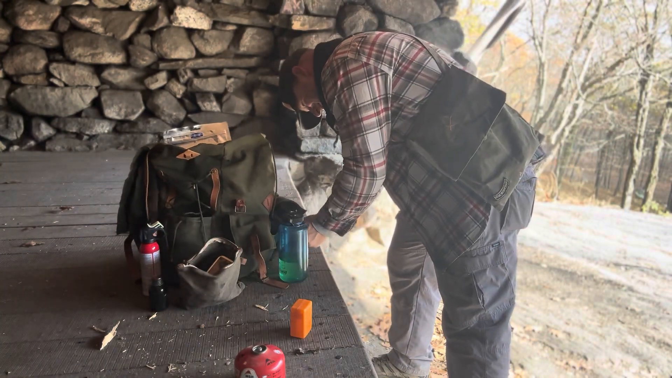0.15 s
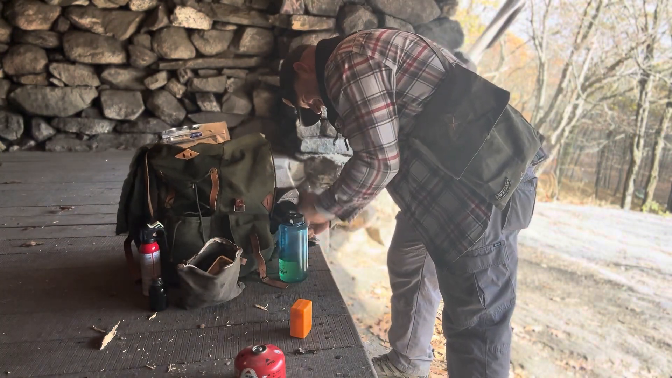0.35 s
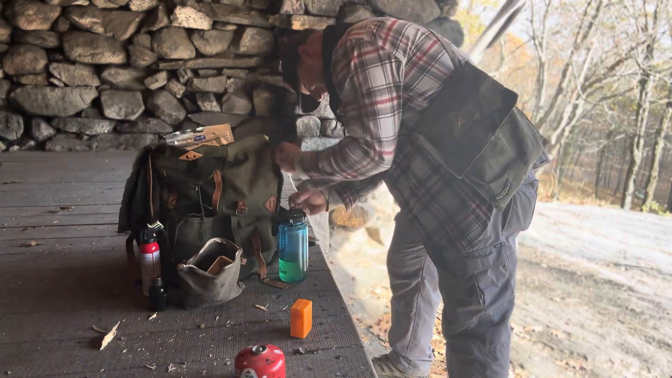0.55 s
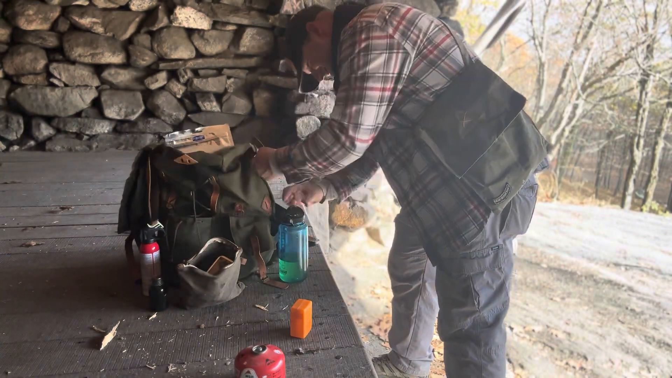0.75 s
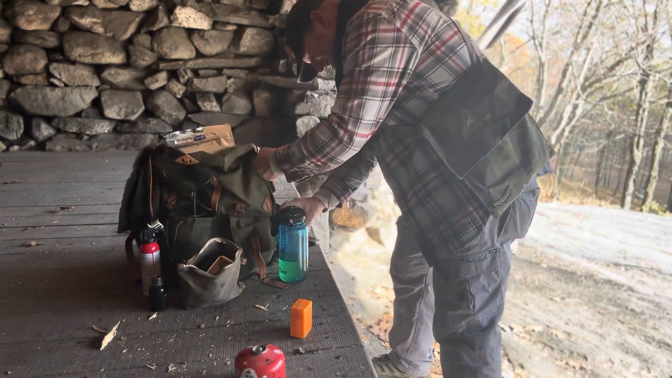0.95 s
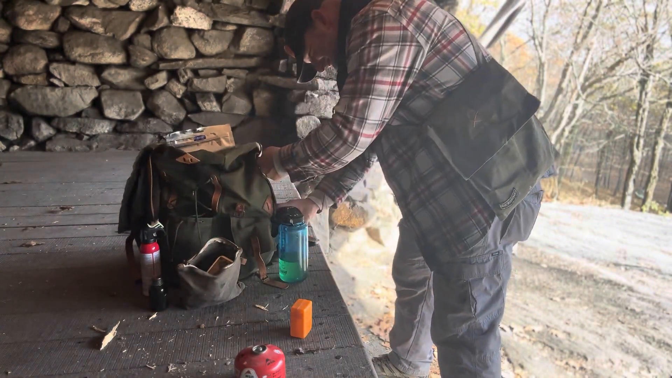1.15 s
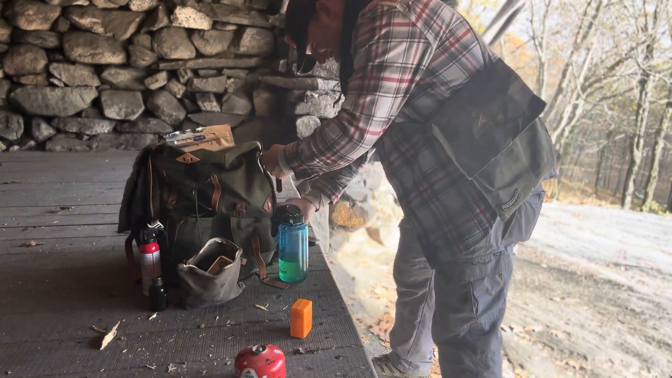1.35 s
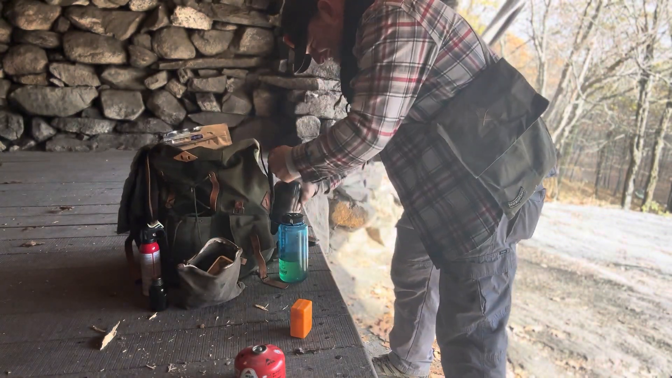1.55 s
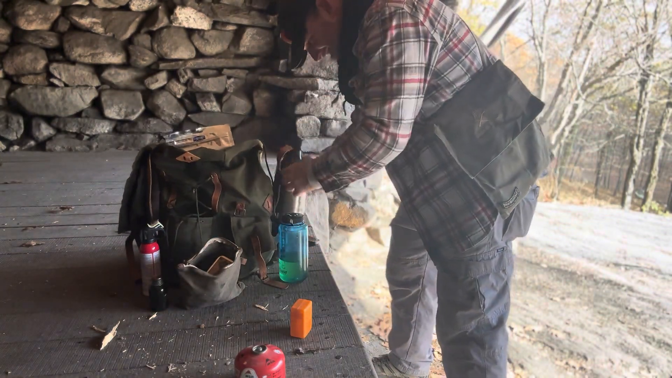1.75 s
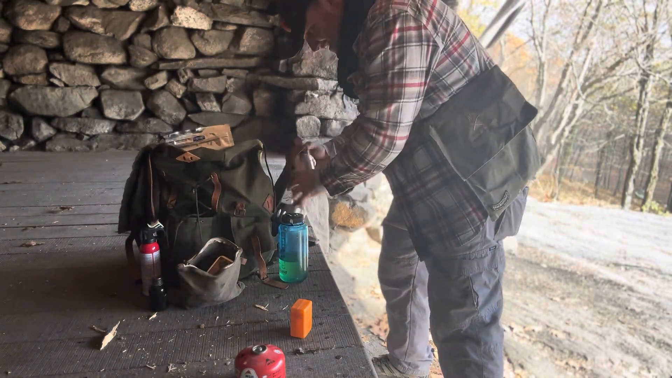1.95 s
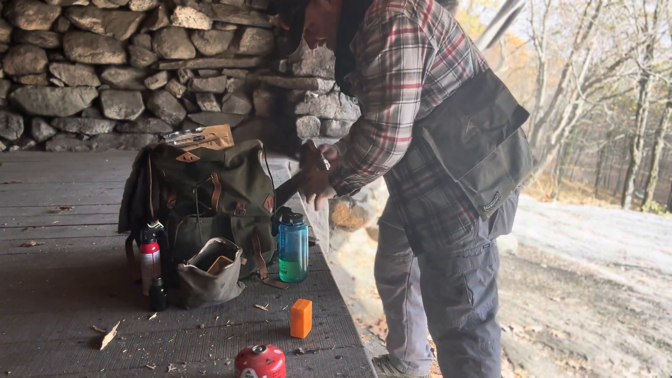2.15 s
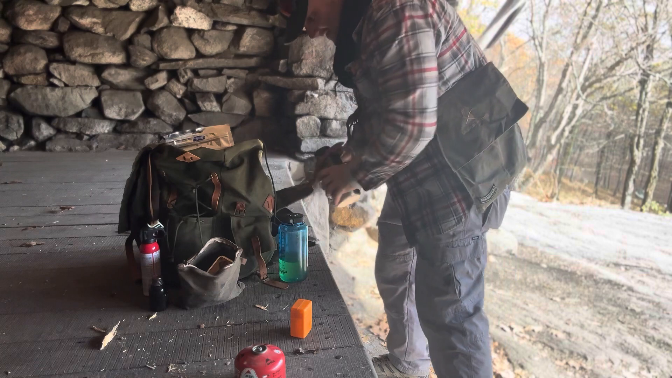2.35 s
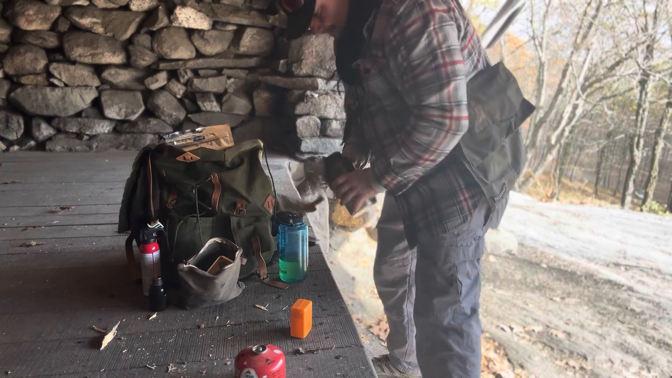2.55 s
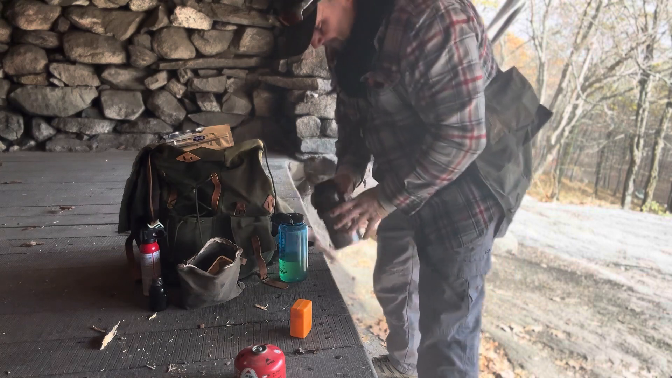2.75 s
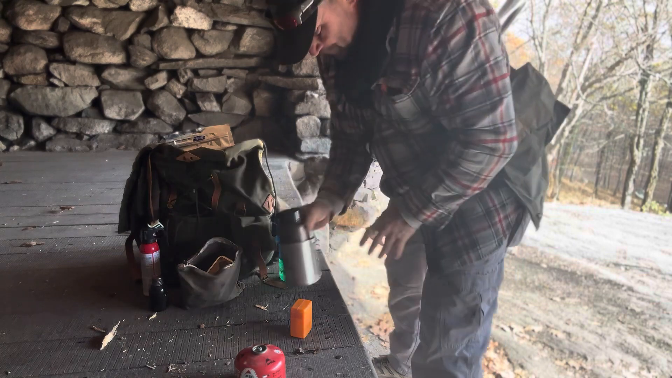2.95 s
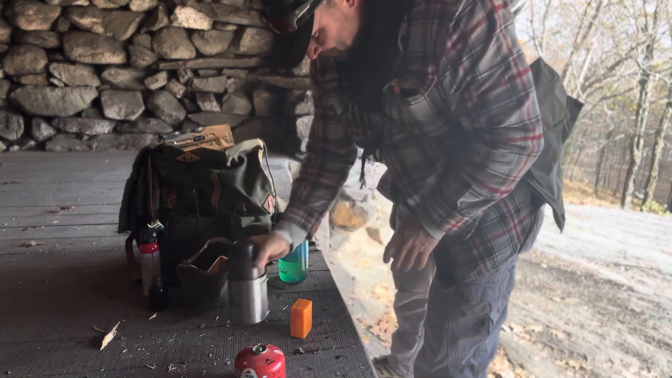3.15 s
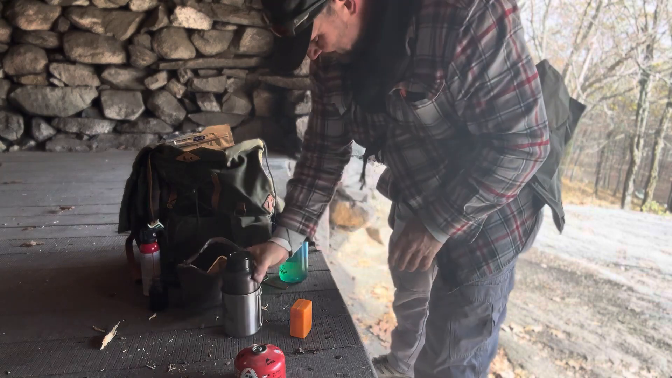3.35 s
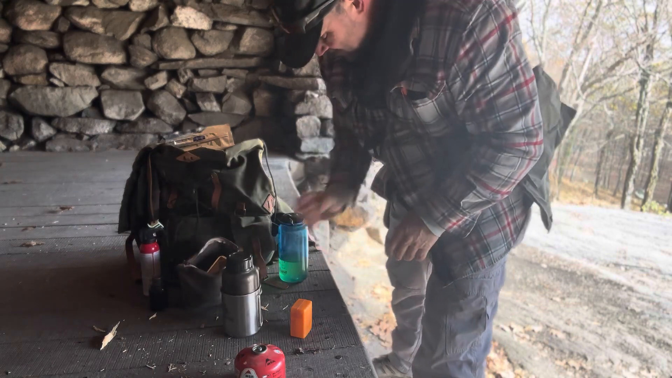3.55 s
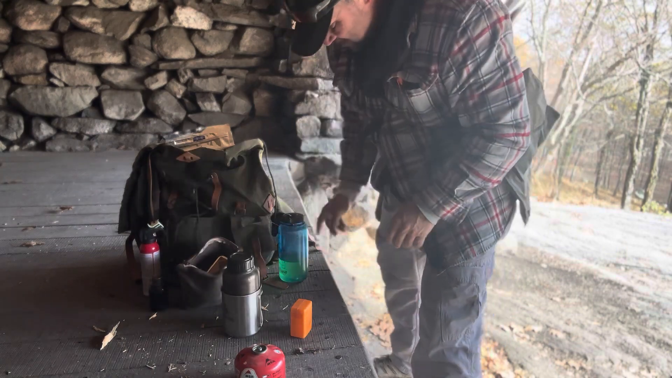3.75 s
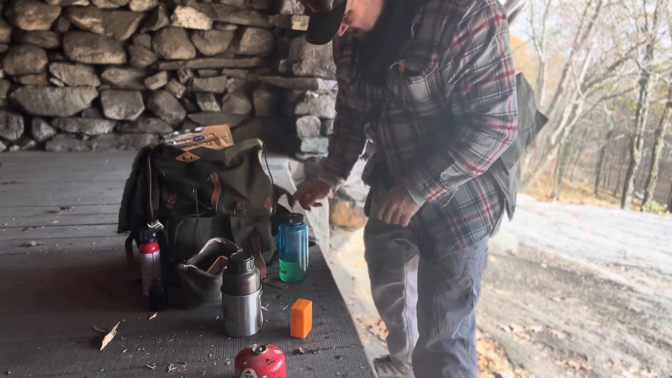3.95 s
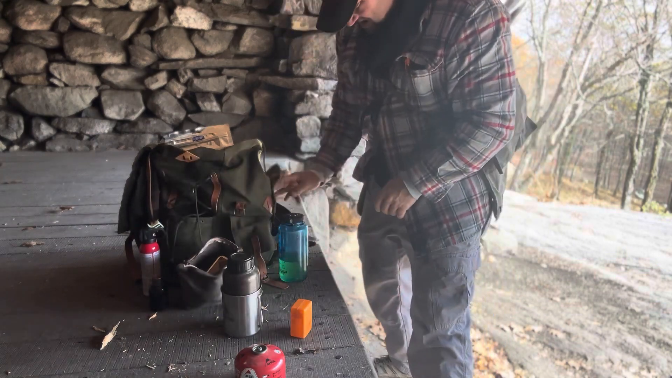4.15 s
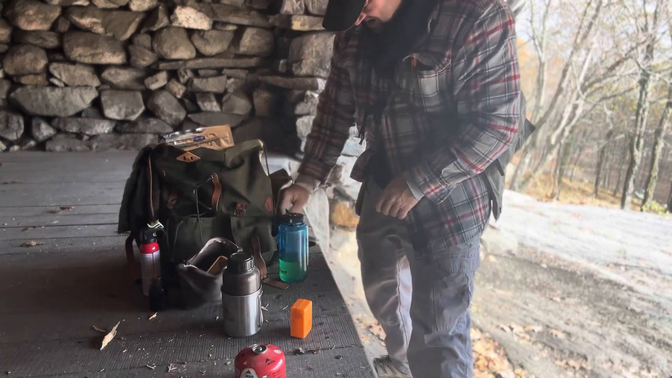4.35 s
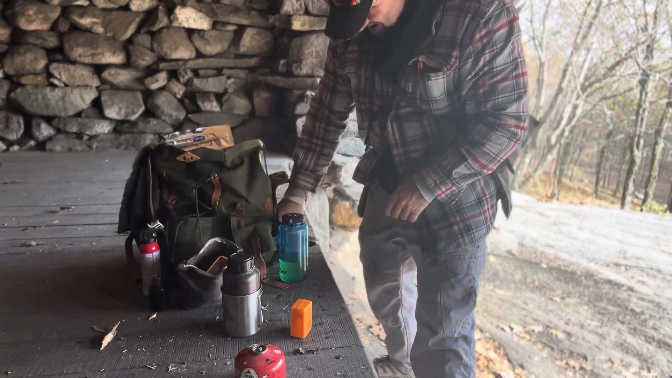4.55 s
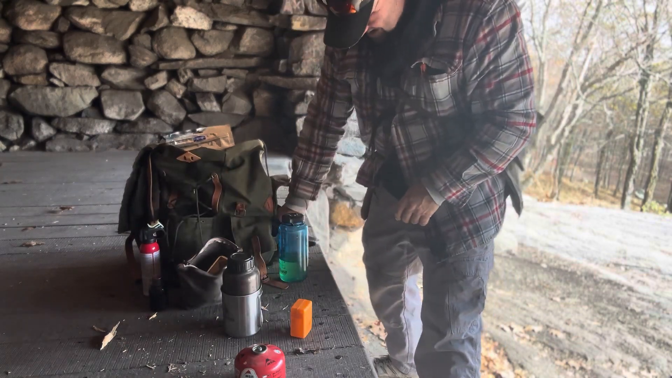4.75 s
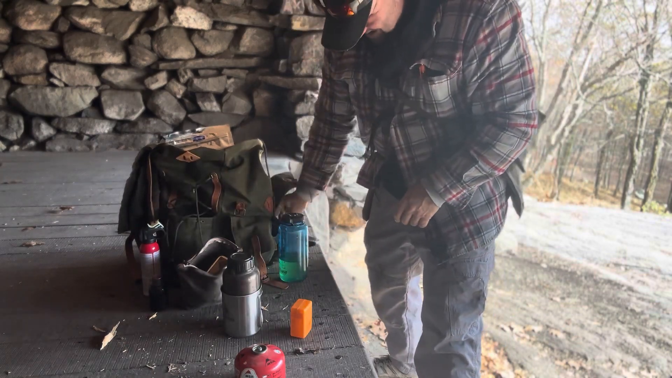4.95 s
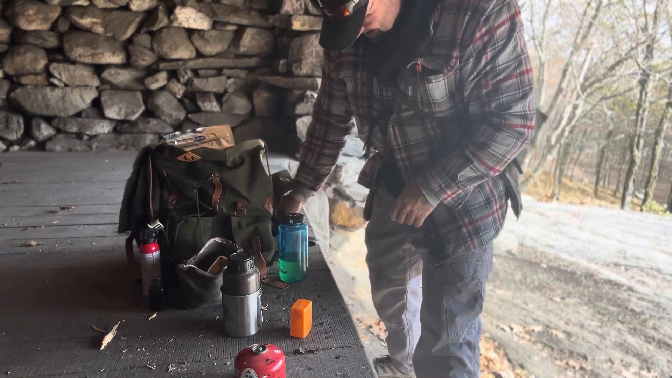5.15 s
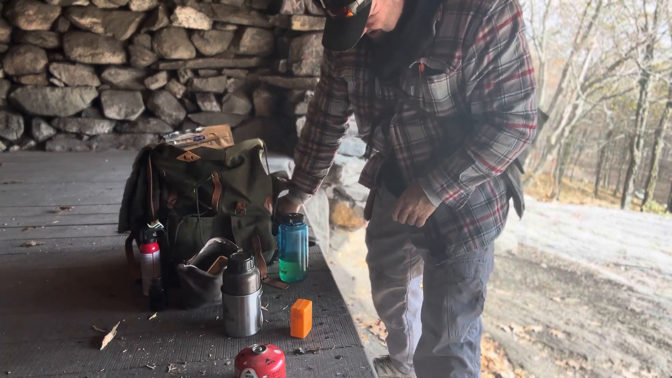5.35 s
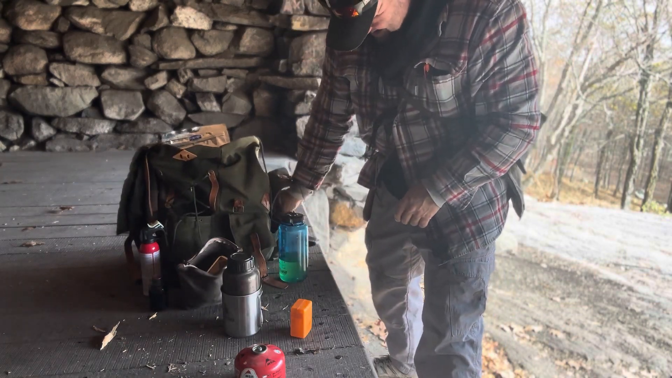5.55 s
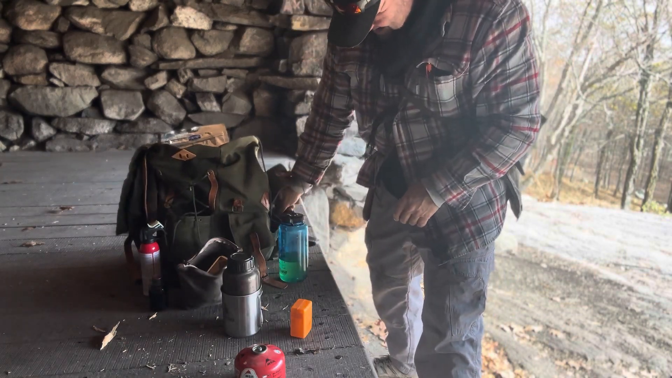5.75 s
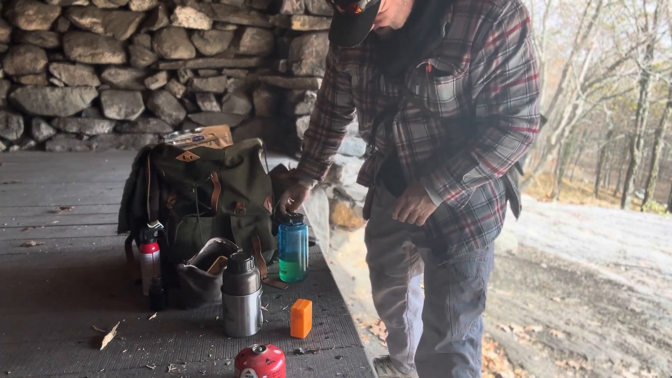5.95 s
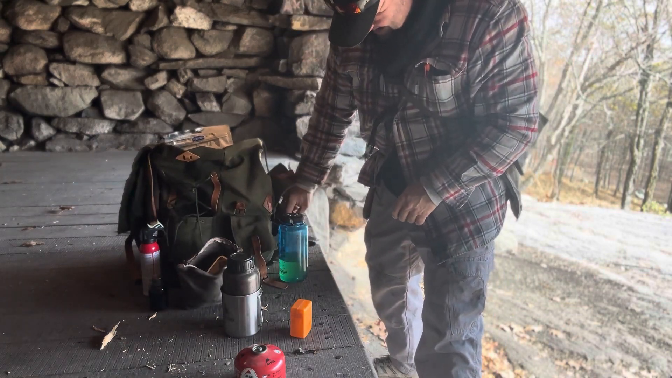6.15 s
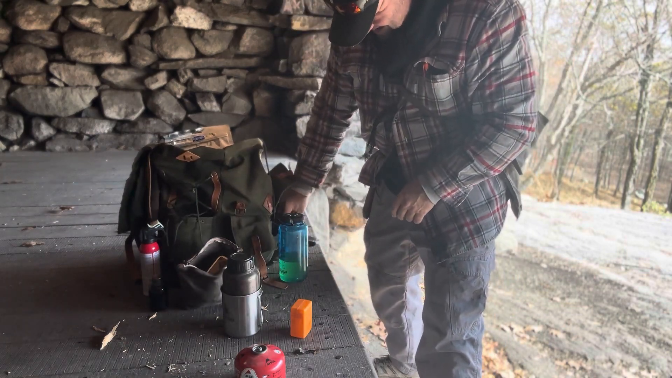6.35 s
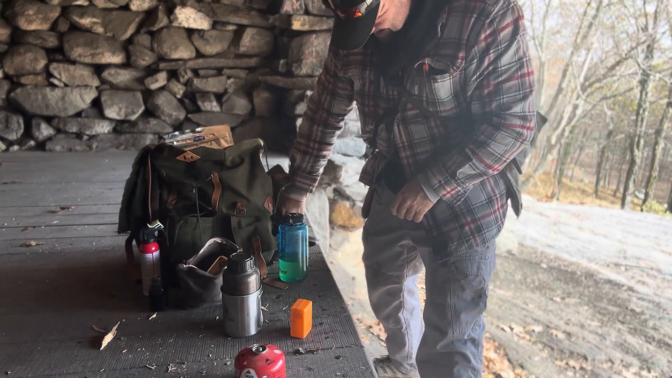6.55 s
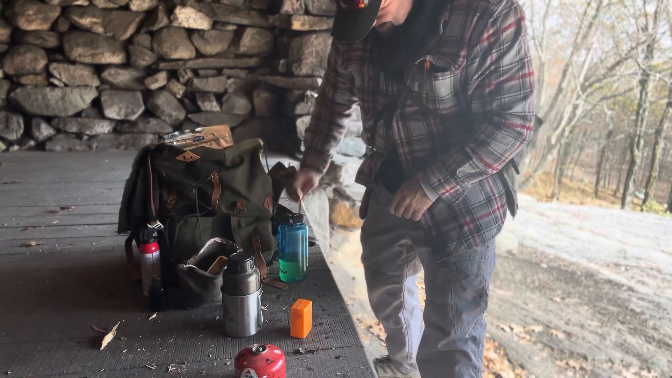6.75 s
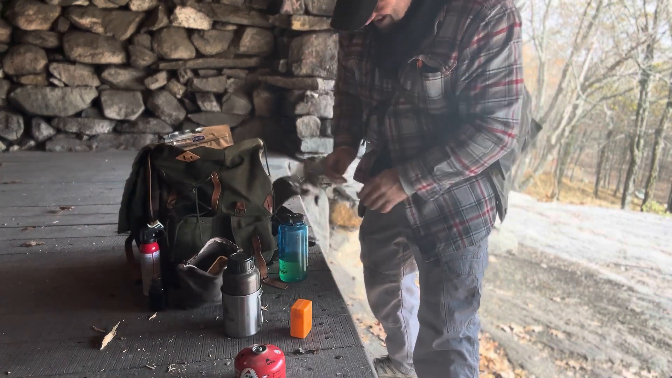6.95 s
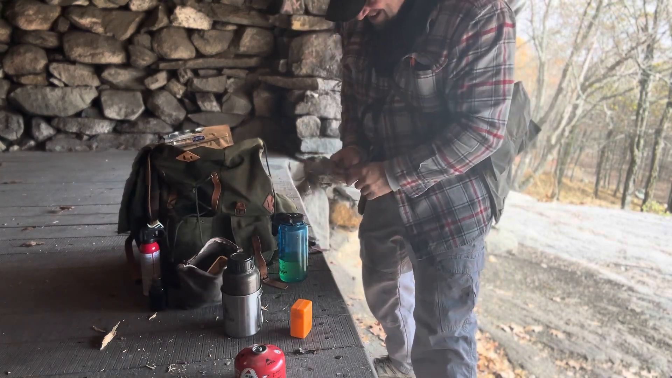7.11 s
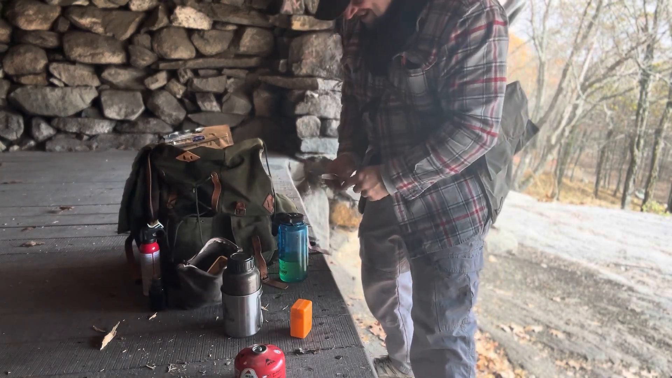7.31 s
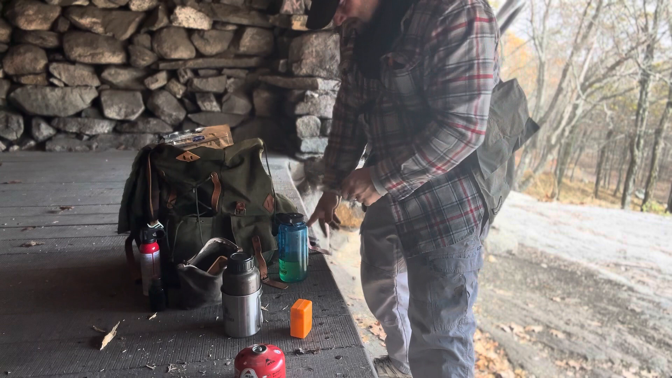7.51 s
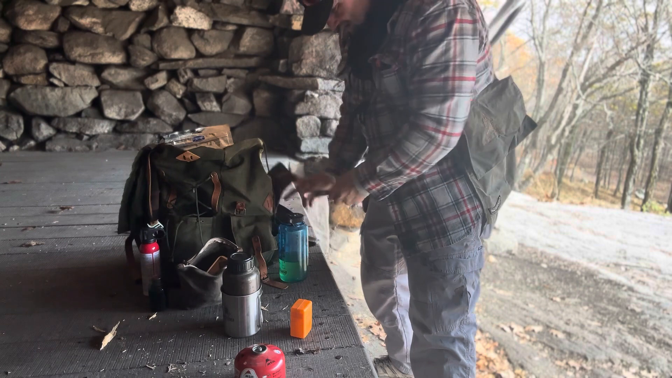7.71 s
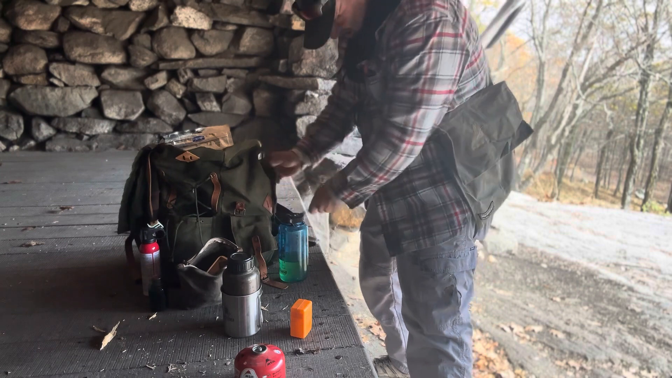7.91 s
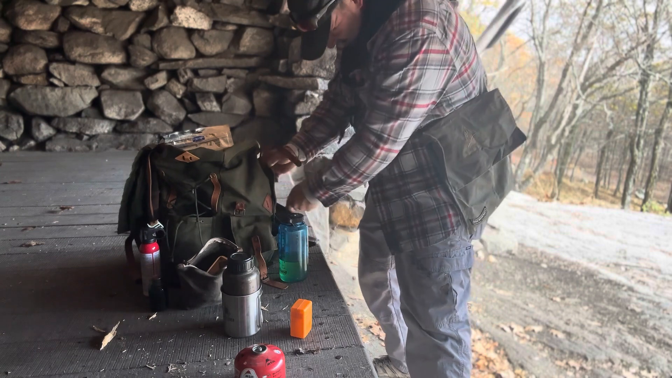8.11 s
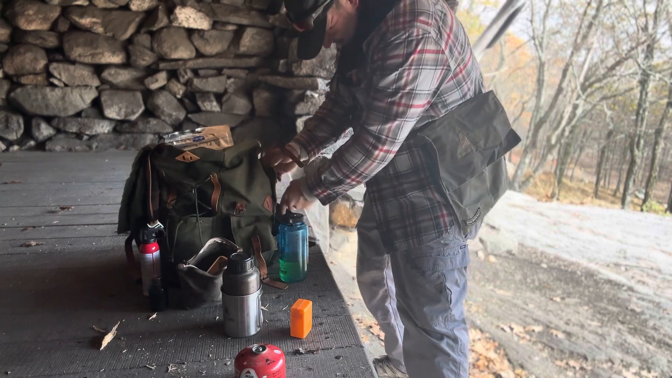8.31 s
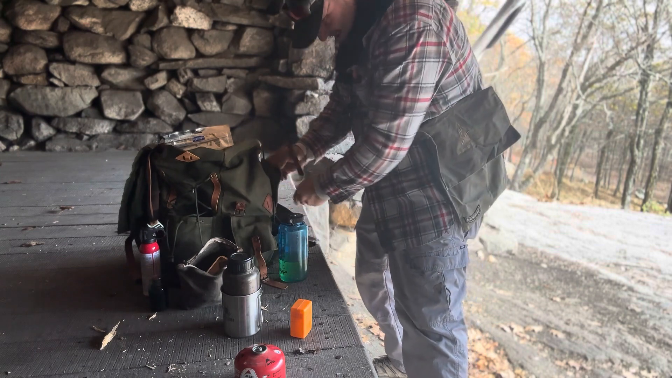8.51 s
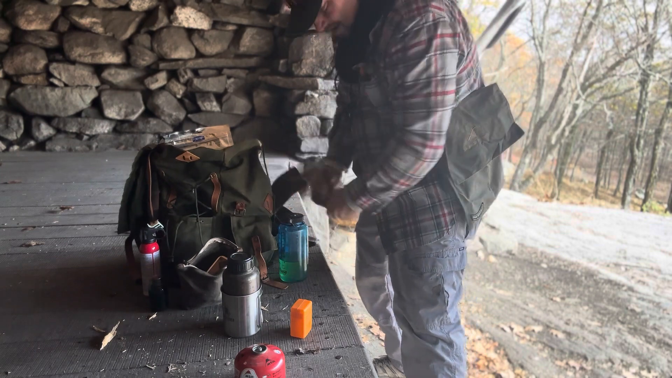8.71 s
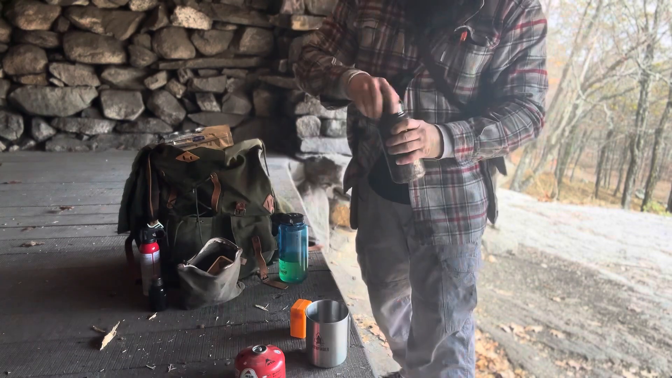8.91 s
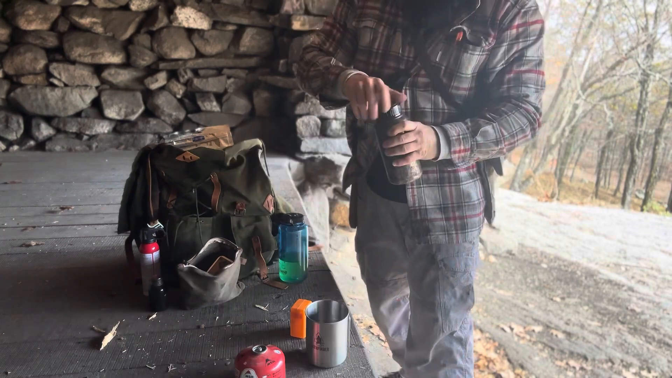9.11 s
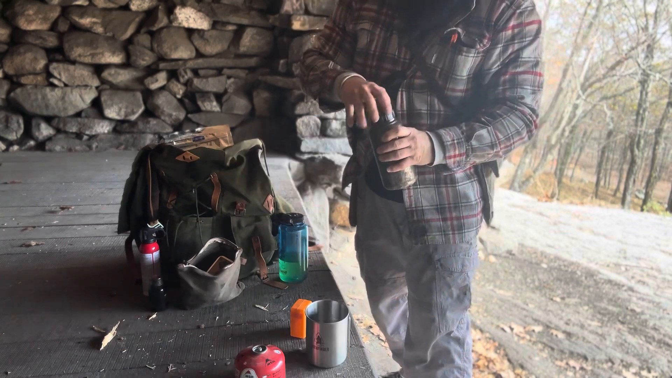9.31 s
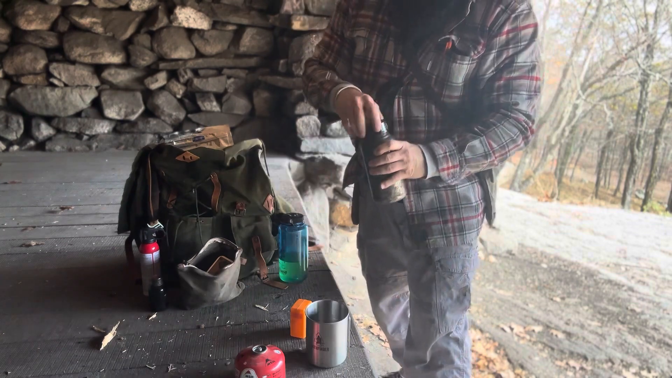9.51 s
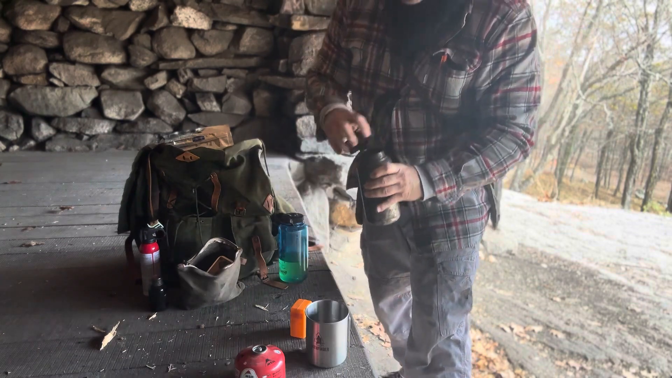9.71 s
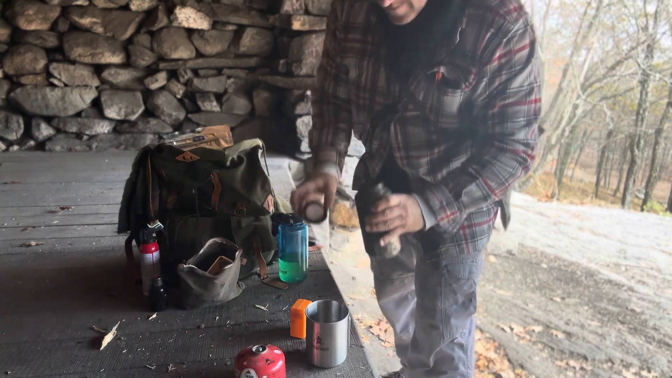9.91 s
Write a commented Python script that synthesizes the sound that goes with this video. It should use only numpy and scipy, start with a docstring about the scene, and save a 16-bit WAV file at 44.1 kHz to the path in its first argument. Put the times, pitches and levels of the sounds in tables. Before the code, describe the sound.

A camper rummages in a canvas pack: dull thuds, ticks and fabric strokes, with a steel cup jangling against other gear. A flask is set down on boards, a sharp metallic knock with a deep wooden boom. Quieter bumps continue, a pot and cup clink, and lastly a steel cap rasps and knocks on its thread. Short stone reflections, quiet outdoor air, slight wind rumble on the microphone.

```python
"""Unpacking a rucksack in an open shelter

A camper unpacks a canvas rucksack on a plank floor: cloth rustles and gear thuds, as filtered friction and bursts.
A steel cup, a flask, a second pot, a hard lid and the flask's cap ring as decaying modes over a crowded clatter.
The flask lands on booming boards and its cap is twisted on a rasping thread; stone reflects the handling.
Coloured noise makes the hush of the forest and the light wind that nudges the microphone.
"""
import sys
import numpy as np
from scipy import signal
from scipy.fft import rfft, irfft, next_fast_len
from scipy.io import wavfile

SR = 44100
rng = np.random.default_rng(int(sys.argv[2]) if len(sys.argv) > 2 else 0)


def wrap_up_sound(samples):
    """Save the sound to the file named by the first command line argument, as 16-bit audio."""
    columns = np.atleast_2d(samples).T
    # keep every value between -1 and 1, then stretch to whole-number steps
    tamed = np.clip(columns, -1, 1)
    steps = np.round(tamed * 32767).astype(np.int16)
    wavfile.write(sys.argv[1], SR, steps)


N = 439677
TIME = np.arange(N) / SR
RING_TIME = np.arange(int(1.25 * SR)) / SR

# Spectrum of the forest's hush: (frequency [Hz], level [dB])
FOREST_SPECTRUM = [(29, -26.5), (50, 1), (87, 0.5), (131, -8.5), (198, -6), (884, -23.5), (2880, -23.5),
                   (7390, -34.5), (15500, -41.5)]
FOREST_DB = -62

# Spectrum of the pressure swell at the microphone: (frequency [Hz], level [dB])
PRESSURE_SPECTRUM = [(1, -0.5), (7, 1), (12, -12.5), (20, -40)]
# Spectrum of the wind's rumble: (frequency [Hz], level [dB])
RUMBLE_SPECTRUM = [(10, -4.5), (50, 2.5), (70, -18), (110, -41)]
# Slow pressure swell at the microphone: (time [s], level [dB])
BREEZE = [(0.0, -65), (1.57, -71.5), (5.67, -33.5), (8.9, -36.5), (9.95, -49)]
# Gusts: (middle [s], length [s], rumble [dB], pressure swell [dB])
GUSTS = [(0.602, 3.3, -62.5, -80.5), (9.305, 0.84, -48, -27.5)]
CALM_DB = -70.5   # mid level of the rumble between the gusts

# How busily the hands work: (time [s], level [dB])
RUMMAGE = [(0, -59.5), (1.2, -68), (3, -65.5), (4.7, -64.5), (5.3, -68), (6.1, -79.5), (6.4, -66),
           (7.2, -81), (7.9, -67.5), (8.6, -80)]
STIR_BRIGHT_DB = -8   # hiss of the jacket over its rub

# Gear bumping inside the pack: (time [s], thud [dB], hardness: tick over thud [dB], hollow note [Hz])
BUMPS = [(.05, -65.5, 18.5, 300), (.107, -58.5, 13.5, 300), (0.205, -49, -8, 477), (.26, -52.5, -1.5, 600),
         (.392, -41, 0.5, 400), (0.407, -38, -1.5, 213), (.421, -48, 6.5, 694), (.533, -55, -10, 1020),
         (.705, -51, -2, 240), (.931, -53, -12, 252), (1.052, -45.5, -22, 383), (1.072, -43.5, -21, 379),
         (1.3426, -38, -11, 450), (1.386, -42, -6.5, 450), (1.543, -33.5, -17, 444), (2.079, -42, -4, 368),
         (2.15, -35, 2, 644), (2.207, -34, -3, 331), (2.224, -36, 1, 880), (2.5948, -40, -21, 367),
         (2.65, -49.5, -15, 298), (2.78, -49, -13, 264), (3.379, -43, -7, 700), (3.857, -52, -19, 230),
         (3.985, -48.5, -25, 393), (4.212, -49.5, -7.5, 793), (4.543, -49, -20, 450),
         (4.689, -54, -26, 344), (4.7163, -40, -4.5, 370), (4.731, -46, -17, 376), (4.754, -47.5, -14, 380),
         (4.85, -46, -28, 368), (4.989, -52.5, -26, 450), (5.074, -43.5, -21, 403),
         (5.138, -40.5, -22, 378), (5.665, -41, -16, 495), (5.86, -48.5, -11, 610),
         (6.515, -45.5, -16, 235), (7.059, -42, -16, 237), (7.591, -49.5, -19, 373),
         (7.698, -44, -23.5, 227), (7.805, -58.5, -11, 1090), (7.855, -53, -25, 215),
         (7.969, -47, -24, 1540), (8.13, -38.5, -25, 220), (8.283, -37, 2, 697), (8.329, -41.5, 3, 714)]
# Spectrum of a muffled thud: (frequency [Hz], level [dB])
THUD_SPECTRUM = [(90, -18), (200, 3), (370, -0.5), (700, -4.5), (1100, -18), (2200, -14.5), (5000, -36)]
# Spectrum of a hard tick or crack: (frequency [Hz], level [dB])
TICK_SPECTRUM = [(500, -22.5), (1400, 1), (2600, -5), (5000, -9.5), (9000, -2.5), (13000, 0),
                 (16000, -14.5)]
THUD_TRIM_DB = -3   # applied to the noise of every thud, not to its hum or tick
# Small things settling in the pack: their level is relative to the rummaging
TAPS_PER_S, TAP_DB, TAP_SPREAD_DB, TAP_HARD_DB = 4.4, 3.5, 4, -8.5
# The pack's usual hollow note, the scatter of stray ones, level over the thud, longest decay
HOLLOW_HZ, HOLLOW_OCTAVES, HOLLOW_DB, HOLLOW_T60_S = 373, .2, 2.5, 0.1
# Each knock on the cup also shakes the gear around it: levels over the cup's clatter
CUP_THUD_DB, CUP_TICK_DB = -9, 1

# Spectrum of canvas rubbing: (frequency [Hz], level [dB])
RUB_SPECTRUM = [(100, -4.5), (220, 9), (450, 0), (900, -4), (1500, -11.5), (2800, -9.5), (5000, -31.5)]
# Spectrum of the weave's hiss: (frequency [Hz], level [dB])
WEAVE_SPECTRUM = [(700, -19.5), (1500, 2), (2900, -1.5), (5000, 1), (7000, -6.5), (9500, -2), (13200, -7),
                  (16000, -12.5)]
# Strokes on canvas and sleeves: (middle [s], length [s], rub [dB], brightness: hiss over rub [dB])
STROKES = [(0.27, 0.13, -56, -5), (0.343, 0.089, -53.5, -4), (0.587, 0.15, -60.5, -5.5),
           (0.743, 0.11, -51.5, -16), (1.504, 0.13, -46.5, -1.5), (1.759, 0.21, -52, 11),
           (2.037, 0.186, -47.5, -25), (2.301, 0.099, -52.5, -8), (3.635, 0.11, -69, 8.5),
           (3.898, 0.09, -48.5, -16), (4.916, 0.18, -60, 0), (5.15, 0.15, -56, -11),
           (5.572, 0.23, -57, -10), (5.814, 0.13, -50.5, -9.5), (6.593, 0.052, -50.5, -6),
           (6.748, 0.075, -54, -9), (7.943, 0.15, -63, -7.5), (9.494, 0.11, -67.5, 0.5)]
# Pitch of the drumming at brightness 0, and the brightening that raises it an octave
RUB_HZ, RUB_DB_PER_OCTAVE = 608, 34
# Each bump drags the canvas: peak after the bump (share of the drag's length), level over the thud
DRAG_DELAY, DRAG_DB = 0.69, -8
# Louder bumps drag longer: length at this thud level, and the rise that doubles it
DRAG_S, DRAG_AT_DB, DRAG_DOUBLING_DB = .02, -45, 12
# Brightness of the drag, and the share of the bump's hardness added to it
DRAG_BRIGHT_DB, DRAG_FOLLOWS = -4, 0.83
# Stiff cloth buckles in tiny snaps: level over the rub, sharpness of each snap's resonance
CREASES_PER_S, CREASE_DB, CREASE_CYCLES = 220, -9, 22

# Knocks on the cup: (time [s], clatter [dB], clatter t60 [s], ping of the spot hit [Hz], ping [dB])
CUP_HITS = [(1.622, -43, 0.084, 1710, -45), (1.6401, -34, 0.11, 5600, -41.5),
            (1.6745, -24, 0.12, 3130, -32), (1.7356, -24, 0.12, 1670, -33), (1.8732, -42, 0.54, 7700, -44),
            (1.9641, -37.5, 0.29, 4580, -41.5), (2.1161, -35, .28, 12140, -33.5),
            (2.148, -37, 0.086, 4460, -38), (2.2031, -39, .2, 2020, -42), (2.2947, -42, 0.14, 5010, -48),
            (5.761, -48, .22, 5200, -54), (5.85, -49.5, 0.18, 4750, -51), (6.595, -50.5, 0.18, 4060, -45),
            (8.279, -39.5, 0.14, 12400, -37), (8.3541, -36, 0.095, 1980, -38)]
# Clear modes of the free cup: (frequency [Hz], level [dB], t60 [s])
CUP_MODES = [(1905, -25, 2.2), (2062, -20.5, .5), (2977, -23, 1), (3311, -30, 0.87), (3591, -30.5, .8),
             (4400, -15.5, .2), (4490, -30, .7), (4840, -15.5, 1.7), (5550, -11.5, 0.2), (6720, -14, .25),
             (7150, -11.5, .18), (7640, -7, 0.16), (8140, -23, .49), (8468, -8.5, .3), (8900, -16, .3),
             (9620, -9, .15), (12800, -8, .1)]
# Crowded short modes of thin steel: (frequency [Hz], level [dB])
CLATTER_SPECTRUM = [(350, -36), (600, -1), (1050, -19), (1610, -8.5), (2370, -12.5), (3080, -2), (3480, -8),
                    (5790, -0.5), (6460, -11.5), (8990, -1), (11200, -11), (12800, -5), (16000, -21.5)]
# Steel sliding on steel: (middle [s], length [s], level [dB])
SCRAPES = [(1.655, 0.045, -35.5), (1.709, .04, -42), (1.788, 0.07, -37.5), (2, 0.061, -43.5),
           (2.155, 0.13, -44), (2.241, 0.069, -46), (5.78, 0.039, -48.5), (8.3, 0.045, -44)]
LOOSE_S = 0.087   # clatter t60 of reference
CUP_RING_DB, CUP_LOOSE_DB = -13, 6   # ring over clatter at LOOSE_S; gain per doubling, as the cup lies looser
CUP_OUT_S, CUP_FREE_DB = 8, 10.5   # until it is lifted out, canvas weakens and shortens its ring
CUP_STILL_S = 8.85   # the cup is silent from here on
CANVAS_DAMP_HZ = 5820   # canvas damps high modes most: at this pitch it adds one per second to 1 / t60
PING_T60_S, PING_SPREAD = 0.14, .035   # a spot of the wall has three modes, this share of its pitch apart
SLIPS_PER_S = 190   # of steel on steel
# Clear, short crowded and long crowded modes woken by a scrape
SCRAPE_RING_DB, SCRAPE_CLATTER_DB, SCRAPE_SHIMMER_DB = -10, -1, -6.5
# A sliding rim catches and pings: level over the scrape
CHATTER_PER_S, CHATTER_DB, CHATTER_SPREAD_DB = 110, -2.5, 2
CHATTER_LOW_HZ, CHATTER_HIGH_HZ = 3990, 12300

# The flask strikes the cup, lands, rocks and is brushed: (time [s], clatter [dB], ring [dB], clatter t60 [s])
FLASK_HITS = [(1.7355, -38, -39.5, .08), (3.2155, -41, -37.5, 0.085), (3.22, -25.5, -31.5, 0.058),
              (3.235, -27, -31.5, 0.054), (3.379, -45.5, -57, 0.088)]
# Modes of the flask: (frequency [Hz], level [dB], t60 [s])
FLASK_MODES = [(1010, -19.5, 0.15), (1210, -4.5, 0.16), (2070, -4.5, 0.12), (2197, -1, .1),
               (2253, -0.5, 0.098), (2370, -10.5, 0.11), (2964, -6, 0.13), (4350, -14, 0.12),
               (5475, -8.5, 0.12), (7300, -13.5, 0.18)]

# Blows on the floor: (time [s], knock [dB], boom of the joists [dB])
PLANK_HITS = [(3.215, -16, -27.5), (3.234, -22, -57), (3.379, -51, -55.5)]
# Modes of the floor: (frequency [Hz], level [dB], t60 [s])
PLANK_MODES = [(36.1, -14, .6), (52, 0, 0.81), (82.5, -13, .7), (102.5, -9, 0.97), (133.3, -3, 0.57),
               (168, 2, 0.16), (205, 1.5, 0.18), (281, 0.5, .25), (341.6, 6.5, 0.21), (484, -0.5, 0.14),
               (553, 3, 0.14), (617, 3, 0.12), (672.4, 3.5, 0.19), (746, -7, .25)]
# Spectrum of a knock on the boards: (frequency [Hz], level [dB])
BOARD_SPECTRUM = [(70, -17), (125, -2), (170, -14), (340, 0.5), (450, -5.5), (660, 2.5), (950, -15),
                  (1250, -16), (1630, -23), (2240, -11), (4000, -22.5)]
# Crowded low modes of the floor: (frequency [Hz], level [dB])
JOIST_SPECTRUM = [(30, 7), (52, 1.5), (80, -8), (125, -8), (160, -19)]
JOISTS_DB, JOISTS_T60_S = 1.5, 0.81   # level over the boom

# Clacks of a hard bottle lid: (time [s], clatter [dB], ring [dB], clatter t60 [s])
LID_HITS = [(4.2585, -54, -55, .05), (4.2615, -45, -50, 0.08), (4.273, -50, -52, 0.1),
            (6.742, -59, -59, 0.084)]
# Modes of the lid: (frequency [Hz], level [dB], t60 [s])
LID_MODES = [(1390, 1.5, .08), (1484, 2, .1), (1950, 10.5, .03), (2277, 6, 0.063), (2490, 10.5, 0.033),
             (3080, -2, 0.1), (4450, 7, 0.044)]

# A second pot is nudged in the pack: (time [s], clatter [dB], ring [dB], clatter t60 [s])
POT_HITS = [(8.1805, -36, -42, 0.28)]
# Modes of the pot: (frequency [Hz], level [dB], t60 [s])
POT_MODES = [(993, -3, 0.32), (2150, -8.5, 0.29), (3890, -12, 0.17), (5060, -5, 0.15), (5960, -3, 0.14),
             (8204, -8, 0.17), (9814, -2, 0.26), (12950, 2.5, 0.09)]

# The cap turns on its thread: (middle [s], length [s], level [dB])
CAP_TURNS = [(8.953, 0.085, -55.5), (9.24, 0.077, -55)]
# Dry rasp over the ring of the neck
THREAD_SLIPS_PER_S, THREAD_T60_S, THREAD_LOW_HZ, THREAD_RASP_DB = 2200, 0.023, 2700, 1
# The steel cap knocks on its thread: (time [s], clatter [dB], ring [dB], clatter t60 [s])
CAP_HITS = [(9.2595, -39.5, -43, 0.048), (9.5055, -39.5, -48, 0.093), (9.5535, -27.5, -29.5, 0.11)]
# Modes of the cap: (frequency [Hz], level [dB], t60 [s])
CAP_MODES = [(653, -9, .15), (760, -1, .027), (1488, -10, 0.27), (1532, -14.5, 0.7), (1550, -8.5, 0.33),
             (2225, -15, .15), (2894, -6.5, 0.13), (3150, -7, 0.23), (3785, -20, 0.4), (4500, -4.5, 0.082),
             (5690, -11, 0.19), (6535, -14.5, 0.24), (7768, -4.5, .08), (8376, -15, .1), (9200, -18, 0.11)]

# Spectra of the close reflections and of the thin tail: (frequency [Hz], level [dB])
EARLY_SPECTRUM = [(100, 1), (3000, 0.56), (16000, -1.6)]
TAIL_SPECTRUM = [(60, -2.5), (3000, 4.5), (8000, -2), (16000, -8.0)]
# The level dips briefly: (time [s], level [dB])
DIP = [(8.82, -4), (8.845, -24), (8.86, -7), (8.89, -1)]
CUTOFF_HZ = 16100


def from_db(db):
    """Level: twenty decibels are a tenfold amplitude."""
    return 10 ** (np.asarray(db) / 20)


def rms_one(x):
    """Normalisation: scale to unit root mean square."""
    return x / np.sqrt(np.mean(x ** 2) + 1e-20)


def gains(rows):
    """Envelope: gains in time, interpolated in decibels from each level column."""
    s, *columns = np.transpose(rows)
    return [from_db(np.interp(TIME, s, db)) for db in columns]


def colour(x, spectrum):
    """Linear filtering: shape a spectrum that falls 24 dB per octave beyond its ends; rms 1."""
    hz, db = np.transpose(spectrum)
    size = next_fast_len(len(x))
    pitch = np.log2(np.fft.rfftfreq(size, 1 / SR) + 0.00089)
    beyond = np.abs(pitch - np.clip(pitch, np.log2(hz[0]), np.log2(hz[-1])))
    gain = from_db(np.interp(pitch, np.log2(hz), db) - 24 * beyond)
    return rms_one(irfft(rfft(x, size) * gain, size)[:len(x)])


def noise(spectrum, size=N):
    """Random excitation: coloured noise of rms 1."""
    return colour(rng.standard_normal(size), spectrum)


def drift(rate):
    """Slow random modulation: independent values of spread 1, `rate` a second, joined by lines."""
    return np.interp(TIME * rate, np.arange(4096), rng.standard_normal(4096))


def swell(middle, length):
    """Smooth stroke: returns its samples and a gain that is half at the ends of its length."""
    span = slice(max(int((middle - length) * SR), 0), min(int((middle + length) * SR), N))
    return span, 2 ** -np.abs((TIME[span] - middle) / (length / 2)) ** 3


def add(track, s, sound):
    """Superposition: mix a sound in at time s."""
    start = round(s * SR)
    track[start:start + len(sound)] += sound[:N - start]


def dying(t60, size=None):
    """Exponential decay: amplitude falls 60 dB in t60 seconds."""
    return np.exp(-np.log(1000) * RING_TIME[:size] / max(t60, 1e-3))


def burst(spectrum, t60):
    """High modal density: modes struck at once sound as noise, dying together."""
    fade = dying(t60)[:int(np.clip(1.3 * t60, .05, 1.2) * SR)]
    return noise(spectrum, size=len(fade)) * fade


def slips(per_s, spread_db):
    """Stick-slip friction: random clicks of uneven size and either sign; rms 1."""
    sizes = from_db(spread_db * np.minimum(rng.exponential(1, N), 4)) * rng.choice([-1, 1], N)
    return rms_one(sizes * (rng.random(N) < per_s / SR))


def resonance(x, hz, width_hz):
    """Resonance: two poles favour one frequency."""
    r = np.exp(-np.pi * width_hz / SR)
    return signal.lfilter([1, 0, -1], [1, -2 * r * np.cos(2 * np.pi * hz / SR), r * r], x)


def high_pass(x, hz):
    """High-pass filtering: a fourth-order cut below the given frequency."""
    return signal.sosfilt(signal.butter(4, hz, "high", fs=SR, output="sos"), x)


def ring(modes, split_hz, vary_db):
    """Mode splitting: a nearly round vessel rings in beating pairs, each of random strength."""
    out = np.zeros(len(RING_TIME))
    chances = rng.standard_normal((len(modes), 3))
    for (hz, db, t60), (strength, gap, side) in zip(modes, chances):
        t = np.float32(RING_TIME[:int(max(t60, .02) * SR)])
        partner_hz = hz + split_hz * (1 + gap / 2)
        pair = np.sin(2 * np.pi * hz * t) + .5 * np.sin(2 * np.pi * partner_hz * t)
        gain = np.sign(side) * from_db(db + vary_db * strength)
        out[:len(t)] += gain * pair * dying(t60, size=len(t))
    return out


def crowded_modes(t60, count=420):
    """Modal density of thin steel: many modes at random pitches and strengths; rms 1 before the decay."""
    size = 32768
    lines = np.zeros(size // 2 + 1, complex)
    bins = rng.integers(size // 80, size * 3 // 8, count)
    lines[bins] = rng.standard_normal(count) * np.exp(2j * np.pi * rng.random(count))
    return colour(irfft(lines), CLATTER_SPECTRUM) * dying(t60)[:size]


def vessel(hits, modes, split_hz, crack_db):
    """Impact excitation: each contact is a crack, a clatter of crowded modes and a clear ring."""
    out = np.zeros(N)
    for s, clatter_db, ring_db, t60 in hits:
        add(out, s, from_db(clatter_db + crack_db) * burst(TICK_SPECTRUM, t60=0.051))
        add(out, s, from_db(clatter_db) * crowded_modes(t60))
        add(out, s, from_db(ring_db) * ring(modes, split_hz, vary_db=1.5))
    return high_pass(out + 1e-18, 480)   # a small vessel radiates no bass


def forest():
    """Broadband ambience: the forest's hush is steady coloured noise."""
    return from_db(FOREST_DB) * noise(FOREST_SPECTRUM)


def wind():
    """Turbulent pressure at the microphone: slow swells and a lumpy rumble grow in the gusts."""
    pressure, = gains(BREEZE)
    rumble = np.full(N, from_db(CALM_DB))
    for middle, length, rumble_db, pressure_db in GUSTS:
        span, gain = swell(middle, length)
        rumble[span] += from_db(rumble_db) * gain
        pressure[span] += from_db(pressure_db) * gain
    lumps = from_db(2.0 * drift(rate=1.5))
    return pressure * noise(PRESSURE_SPECTRUM) + rumble * noise(RUMBLE_SPECTRUM) * lumps


def clothes():
    """Cloth friction: the camper's jacket stirs faintly, as busily as the hands work in the pack."""
    busy, = gains(RUMMAGE)
    rub = colour(slips(per_s=1100, spread_db=1.5), RUB_SPECTRUM)
    stir = rub + from_db(STIR_BRIGHT_DB) * noise(WEAVE_SPECTRUM)
    return busy * stir * from_db(8.0 * np.minimum(drift(rate=12), 1))


def taps():
    """Random arrivals: small bumps follow the rummaging; rows (time [s], thud [dB], hardness [dB])."""
    times = TIME[rng.random(N) < TAPS_PER_S / SR]
    levels = np.interp(times, *np.transpose(RUMMAGE)) + TAP_DB
    chance = TAP_SPREAD_DB * rng.standard_normal((len(times), 2))
    return [(s, db + louder, TAP_HARD_DB + harder)
            for s, db, (louder, harder) in zip(times, levels, chance)]


def gear():
    """Damped impact: gear thuds, hums and ticks when bumped, when the cup is knocked, and as it settles."""
    shaken = [(s, db + CUP_THUD_DB, CUP_TICK_DB - CUP_THUD_DB) for s, db, *_ in CUP_HITS]
    stray = [(*row, HOLLOW_HZ * 2 ** (HOLLOW_OCTAVES * rng.standard_normal()))
             for row in shaken + taps()]
    out = np.zeros(N)
    for s, db, hard_db, hz in BUMPS + stray:
        higher = max(hz / HOLLOW_HZ, 1)   # small things knock higher and their hum dies sooner
        thud_spectrum = [(f * higher, level) for f, level in THUD_SPECTRUM]
        hum = np.sin(2 * np.pi * hz * RING_TIME) * dying(HOLLOW_T60_S / np.sqrt(higher))
        add(out, s, from_db(db + THUD_TRIM_DB) * burst(thud_spectrum, t60=0.1))
        add(out, s, from_db(db + HOLLOW_DB) * hum)
        add(out, s, from_db(db + hard_db) * burst(TICK_SPECTRUM, t60=0.04))
    return out


def creases(count=14):
    """Buckling: folds of stiff cloth snap, each at a pitch of its own; rms 1."""
    snaps = np.zeros(N)
    for hz in np.geomspace(750, 3400, count):
        clicks = slips(per_s=CREASES_PER_S / count, spread_db=5.5) + 1e-18
        snaps += rms_one(resonance(clicks, hz, width_hz=2 * hz / CREASE_CYCLES))
    return rms_one(snaps)


def canvas():
    """Stick-slip on canvas, under the hand and behind each bump: brighter strokes drum higher and hiss more."""
    tugs = drift(rate=45)
    friction = colour(slips(per_s=700, spread_db=2.0), RUB_SPECTRUM) * from_db(5.3 * tugs)
    hiss = colour(slips(per_s=2600, spread_db=4.0), WEAVE_SPECTRUM)
    hiss = hiss * from_db(1.0 * tugs + 1.0 * drift(rate=38))
    crackle = from_db(CREASE_DB) * creases()
    drags = []
    for s, db, hard_db, _ in BUMPS:
        length = DRAG_S * 2 ** ((db - DRAG_AT_DB) / DRAG_DOUBLING_DB)
        bright_db = DRAG_BRIGHT_DB + DRAG_FOLLOWS * hard_db
        drags.append((s + DRAG_DELAY * length, length, db + DRAG_DB, bright_db))
    out = np.zeros(N)
    for middle, length, db, bright_db in STROKES + drags:
        span, gain = swell(middle, length)
        hz = RUB_HZ * 2 ** (bright_db / RUB_DB_PER_OCTAVE)
        drumming = rms_one(resonance(friction[span], hz, width_hz=.5 * hz))
        rub = rms_one(drumming + from_db(2.0) * friction[span])
        out[span] += from_db(db) * gain * (rub + crackle[span] + from_db(bright_db) * hiss[span])
    return out


def ping(hz):
    """Local modes: one spot of a steel wall rings briefly in three close modes."""
    modes = [(hz * (1 + PING_SPREAD * k), -5 * abs(k), PING_T60_S) for k in (-1, 0, 1)]
    return ring(modes, split_hz=27.6, vary_db=1.0)


def scraping(modes):
    """Friction-driven modes: each scrape of steel wakes other crowded modes, and the rim catches and pings."""
    friction = slips(per_s=SLIPS_PER_S, spread_db=-2.5) * from_db(2.0 * drift(rate=42))
    out = np.zeros(N)
    for middle, length, db in SCRAPES:
        span, gain = swell(middle, length)
        parts = [(SCRAPE_RING_DB, ring(modes, split_hz=4.1, vary_db=-7.5)),
                 (SCRAPE_CLATTER_DB, crowded_modes(t60=0.08)),
                 (SCRAPE_SHIMMER_DB, crowded_modes(t60=0.55, count=220))]
        body = np.zeros(len(RING_TIME))
        for part_db, part in parts:
            add(body, 0, from_db(part_db) * part / np.linalg.norm(part))
        force = from_db(db) * gain * rms_one(friction[span])
        add(out, span.start / SR, signal.fftconvolve(force, body))
        for catch in np.flatnonzero(rng.random(len(gain)) < CHATTER_PER_S / SR):
            hz = CHATTER_LOW_HZ * (CHATTER_HIGH_HZ / CHATTER_LOW_HZ) ** rng.random()
            catch_db = db + CHATTER_DB + CHATTER_SPREAD_DB * rng.uniform(-1, 1)
            add(out, (span.start + catch) / SR, from_db(catch_db) * gain[catch] * ping(hz))
    return out


def cup():
    """Damping by contact: the looser the knocked and scraped cup lies, the more it rings."""
    packed = [(hz, db, 1 / (1 / t60 + (hz / CANVAS_DAMP_HZ) ** 2)) for hz, db, t60 in CUP_MODES]
    inside, free = [], []
    for s, db, t60, *_ in CUP_HITS:
        ring_db = db + CUP_RING_DB + CUP_LOOSE_DB * np.log2(t60 / LOOSE_S) + CUP_FREE_DB * (s > CUP_OUT_S)
        (free if s > CUP_OUT_S else inside).append((s, db, ring_db, t60))
    out = scraping(packed) + vessel(inside, packed, split_hz=1.4, crack_db=-7.5)
    out += vessel(free, CUP_MODES, split_hz=0.69, crack_db=0)
    for s, _, _, ping_hz, ping_db in CUP_HITS:
        add(out, s, from_db(ping_db) * ping(ping_hz))
    return out * np.clip((CUP_STILL_S - TIME) / 0.02, 0, 1)


def flask():
    """Modal ringing: the steel flask strikes the cup, lands and rocks on its rim, and is brushed."""
    return vessel(FLASK_HITS, FLASK_MODES, split_hz=50, crack_db=-2.0)


def planks():
    """Plate vibration: the boards knock, and the floor booms on beneath them."""
    out = np.zeros(N)
    boom = np.zeros(len(RING_TIME))
    for k, (hz, mode_db, t60) in enumerate(PLANK_MODES):
        boom += (-1) ** k * from_db(mode_db) * np.sin(2 * np.pi * hz * RING_TIME) * dying(t60)
    for s, db, boom_db in PLANK_HITS:
        add(out, s, from_db(db) * burst(BOARD_SPECTRUM, t60=0.099))
        add(out, s, from_db(boom_db) * boom)
        add(out, s, from_db(boom_db + JOISTS_DB) * burst(JOIST_SPECTRUM, t60=JOISTS_T60_S))
    return out


def lid():
    """Strongly damped modes: a hard bottle lid clacks."""
    return vessel(LID_HITS, LID_MODES, split_hz=56, crack_db=0.5)


def pot():
    """Modal ringing: a second pot is nudged in the pack."""
    return vessel(POT_HITS, POT_MODES, split_hz=30, crack_db=-9)


def thread():
    """Stick-slip on the cap's thread: a dry rasp, and a short ring in the high modes of the flask's neck."""
    friction = slips(per_s=THREAD_SLIPS_PER_S, spread_db=2.0) * from_db(2.0 * drift(rate=45))
    neck = rms_one(signal.fftconvolve(friction, crowded_modes(THREAD_T60_S))[:N])
    rasp = from_db(THREAD_RASP_DB) * colour(friction, WEAVE_SPECTRUM)
    turning = rms_one(high_pass(neck + rasp, THREAD_LOW_HZ))
    out = np.zeros(N)
    for middle, length, db in CAP_TURNS:
        span, gain = swell(middle, length)
        out[span] += from_db(db) * gain * turning[span]
    return out


def cap():
    """Modal ringing: the flask's steel cap knocks on its thread."""
    return vessel(CAP_HITS, CAP_MODES, split_hz=27.0, crack_db=-6)


def shelter(x, early_db, tail_db):
    """Reverberation: close floor and wall reflections, then a thin tail under the open roof."""
    early = burst(EARLY_SPECTRUM, t60=0.22)
    tail = burst(TAIL_SPECTRUM, t60=0.87)
    echo = np.zeros(len(RING_TIME) + SR)
    add(echo, .003, from_db(early_db) * early / np.linalg.norm(early))
    add(echo, .02, from_db(tail_db) * tail / np.linalg.norm(tail))
    return x + signal.fftconvolve(x, echo)[:N]


def scene():
    """Direct-to-reverberant ratio: the cap is turned near the microphone, so it sounds drier than the rest."""
    soft = clothes() + gear() + canvas()
    hard = cup() + flask() + planks() + lid() + pot()
    handling = shelter(soft + hard, early_db=-8.5, tail_db=-30.5)
    near = shelter(thread() + cap(), early_db=-11.0, tail_db=-48.0)
    outdoors = forest() + wind()
    dip, = gains(DIP)
    return ((handling + near + outdoors) * dip)[None]


def record(dry):
    """Band limitation: a steep elliptic low-pass cuts the top."""
    return signal.sosfilt(signal.ellip(10, .1, 80, CUTOFF_HZ, fs=SR, output="sos"), dry)


dry = scene()
out = record(dry)
wrap_up_sound(out)
```